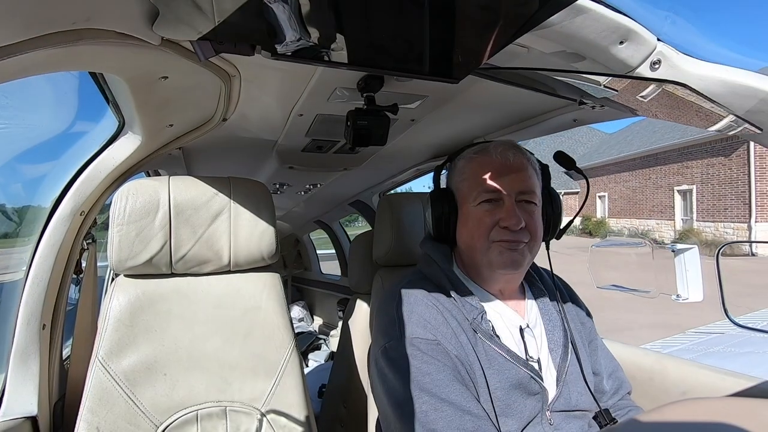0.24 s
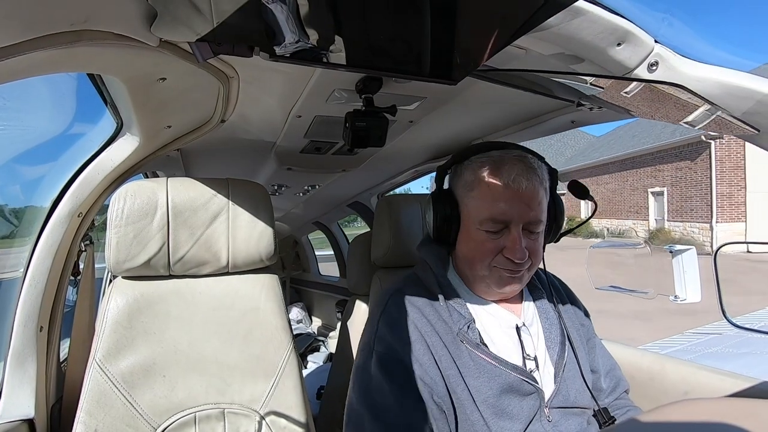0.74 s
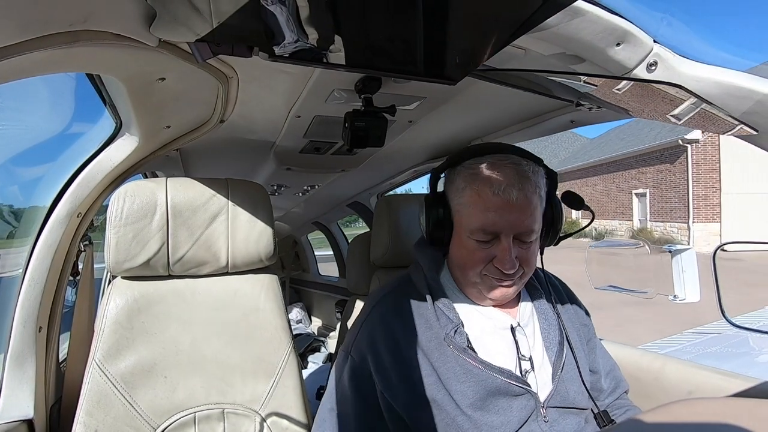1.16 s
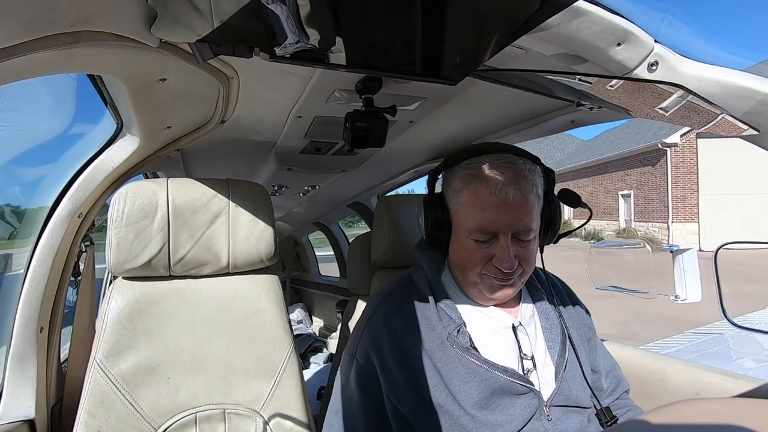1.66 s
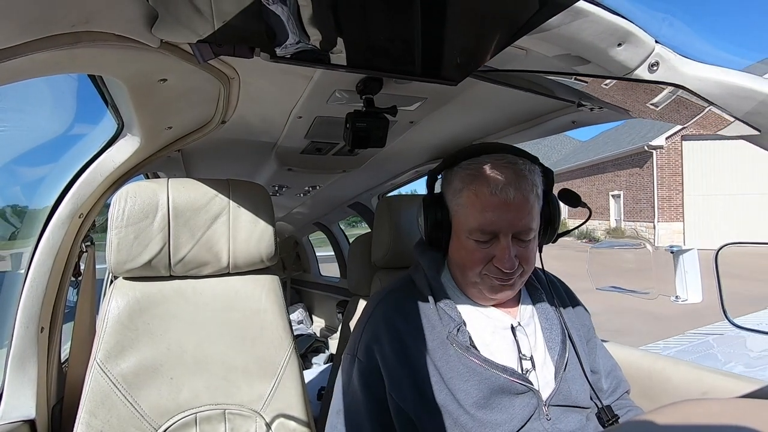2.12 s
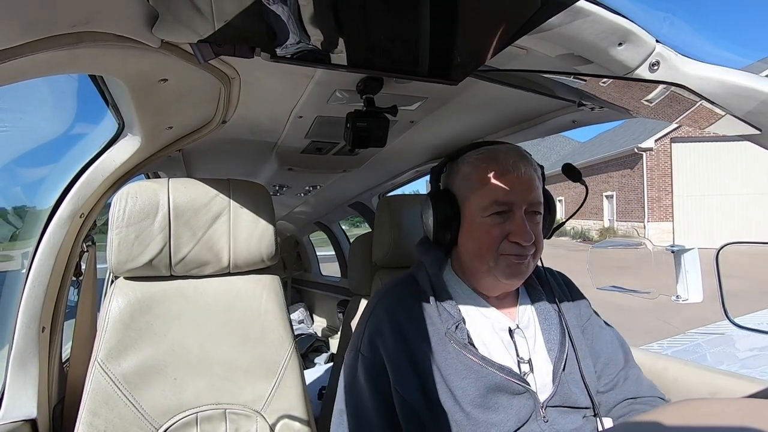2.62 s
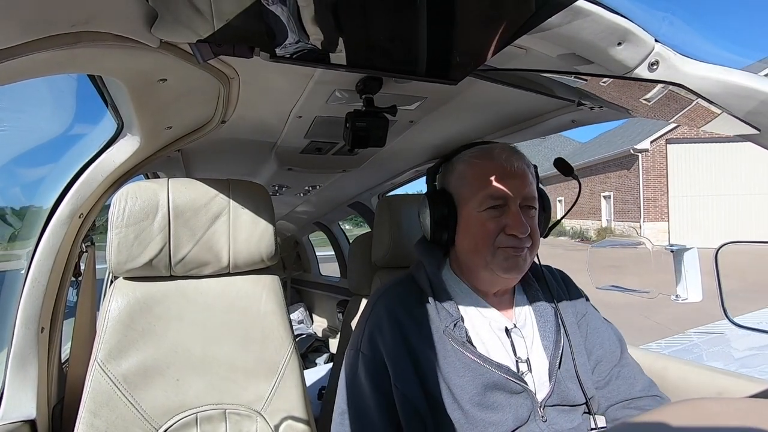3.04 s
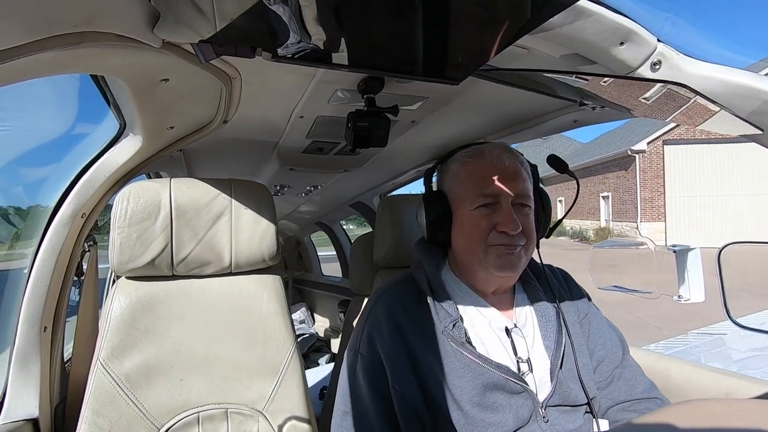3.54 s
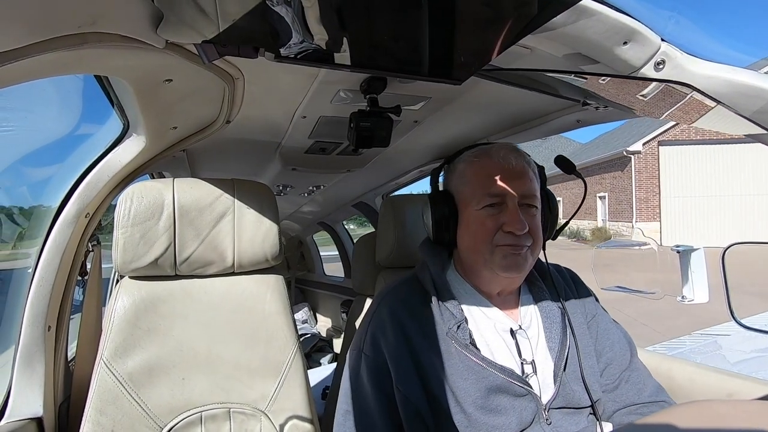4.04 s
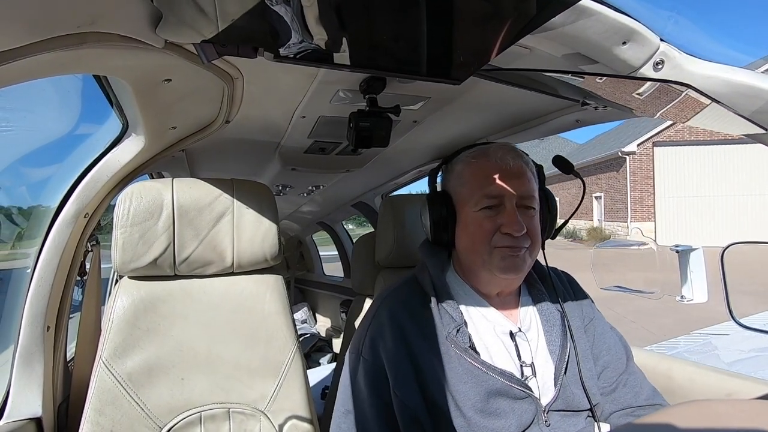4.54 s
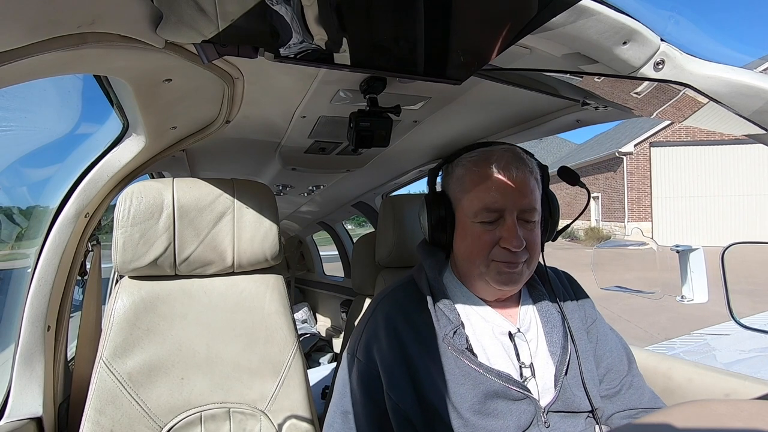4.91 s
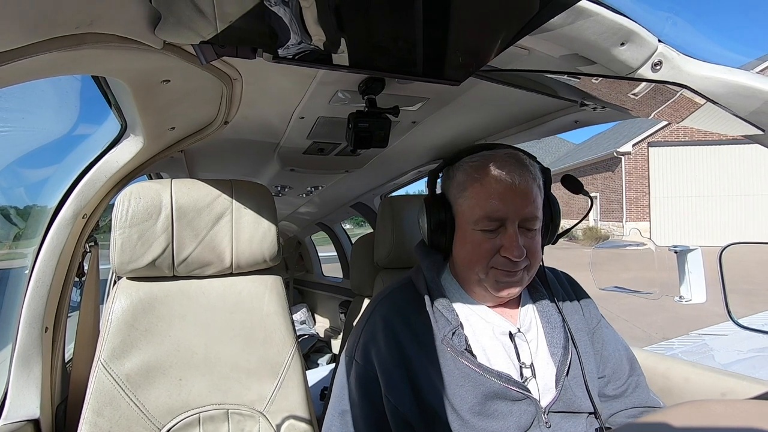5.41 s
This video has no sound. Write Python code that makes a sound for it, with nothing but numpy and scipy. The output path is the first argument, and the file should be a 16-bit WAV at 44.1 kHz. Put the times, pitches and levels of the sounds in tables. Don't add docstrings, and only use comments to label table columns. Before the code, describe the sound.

Inside a small parked aircraft, a piston engine idles in a deep, throbbing drone with low rumble, pulsing hiss and dry trim rattles.

```python
import sys
import numpy as np
from scipy import signal
from scipy.fft import rfft, irfft, next_fast_len
from scipy.io import wavfile
from scipy.ndimage import uniform_filter1d

SR = 44100
rng = np.random.default_rng(int(sys.argv[2]) if len(sys.argv) > 2 else 0)


def nominal_scale(level):
    x = np.asarray(level, float) / 20
    return 10 ** x


def master(y):
    cut = np.clip(np.atleast_2d(y).T, -1, 1)
    pcm = np.round(cut * 32767)
    wavfile.write(sys.argv[1], SR, pcm.astype(np.int16))


N = 250124
IDLE_RPM = 1085

# (time [s], speed [rpm])
CRANK_SPEED = [(0.2, 1105.5), (0.6, 1098.9), (1.0, 1094.1), (1.4, 1090.2), (1.8, 1085.9), (2.2, 1085.5),
               (2.6, 1082.9), (3.0, 1084.5), (3.4, 1085.1), (3.8, 1088.1), (4.2, 1089.6), (4.6, 1086.3),
               (5.0, 1082.0), (5.4, 1080.4)]
# (time [s], wash [dB], bite [dB])
ENGINE_LOAD = [(0.0, -32.5, -31.5), (0.3, -29.5, -28), (0.54, -30, -34), (0.75, -27, -25),
               (1.2, -29, -23.5), (1.6, -28.5, -22), (2.05, -27.5, -20.5), (2.7, -28.5, -20),
               (3.0, -26.5, -18), (3.45, -26, -20.5), (3.75, -28, -16.5), (3.95, -28.5, -18.5),
               (4.35, -28, -20), (4.75, -29.5, -24.5), (5.12, -30.5, -18), (5.67, -29.5, -26.5)]
LEAD_ORDERS = (6, 12, 18, 9, 24, 36, 90, 30)
# (mean [dB], share of wash [dB/dB], share of bite [dB/dB], rise above idle [dB/rpm])
LEAD_LAWS = [
    (-19.5, -0.7, 0.03, -0.0762),
    (-21.5, 0.15, 1.0, .01),
    (-22.5, 0.43, 0.31, 0.27),
    (-30.5, 2.3, -1.2, -0.175),
    (-39.5, 1.15, 1.87, 0.61),
    (-42.5, -0.9, 0.13, 0.0647),
    (-55.5, -0.2, -0.5, 0.28),
    (-42.5, -1.4, 0.63, -0.19),
]
# (time [s], half length [s], rise [dB])
PANEL_SWELLS = [
    (1.203, 1.5, 8),
    (1.602, .4, 13.5),
    (3.1, 0.92, 8),
]
# (multiple of the cycle [1], level against firing [dB])
WEAK_ORDERS = [(1, -32), (2, -24), (3, -20), (4, -19), (5, -20), (7, -16), (8, -17), (10, -18), (11, -15),
               (13, -25), (14, -17), (15, -20), (16, -33), (17, -27), (19, -14), (20, -16), (21, -11),
               (22, -17), (23, -21), (25, -23), (26, -19), (27, -22), (28, -24), (29, -19), (31, -20),
               (32, -30), (33, -20)]
# (multiple of the cycle [1], level [dB])
PANEL_ORDERS = [(47, -46), (49, -47.5), (52, -48.5), (54, -44.5), (57, -51), (59, -55.5), (60, -52.5),
                (62, -52.5), (66, -50.5), (67, -51), (72, -52.5), (79, -51), (87, -51), (91, -53.5),
                (114, -53), (126, -55.5), (179.5, -63.5)]
# (frequency [Hz], level [dB per Hz])
RUMBLE_SPECTRUM = [(18, -20), (35, 1), (60, -6), (100, -1.5), (124, -8.5), (142, -8), (154, -7.5),
                   (178, -3.5), (230, -8), (290, -8), (350, -11), (600, -12.5), (1100, -19.5), (1500, -32)]
# (frequency [Hz], level [dB per Hz])
CLATTER_SPECTRUM = [(1100, 3), (1600, 3.5), (2300, -14), (2750, 0.5), (3300, -4), (3950, -10.5),
                    (4600, -17.5), (5200, -30)]
# (place in cycle [0-1], rise [dB], decay [cycles])
VALVE_SEATINGS = [
    (.40, 2.5, .12),
    (.86, 2.5, .15),
]
# (time [s], peak level [dB], left over right [dB])
TRIM_KNOCKS = [(0.1865, -34, 0), (0.5975, -34, -1), (0.6355, -34, -6.5), (0.7222, -38, 0),
               (0.8011, -28.5, -7), (0.857, -35, -6.5), (0.9657, -32, -1.5), (1.075, -36, -4),
               (1.1847, -33, -3), (1.2481, -37.5, -8), (1.296, -34, 3.5), (1.8477, -34, -3),
               (1.9699, -32, 0), (2.0677, -31.5, -0.5), (2.4009, -36, -10.5), (2.4907, -33, -2.5),
               (2.5782, -33, 1.5), (2.8411, -34, 4), (3.255, -35.5, 2.5), (3.3967, -36, -2),
               (4.398, -35.5, 0.5), (4.4473, -32.5, -5), (4.6154, -31.5, -4), (4.7042, -33, 0),
               (4.781, -38.5, -4), (4.8915, -33, -8), (5.1415, -35, -3), (5.2235, -36, 1),
               (5.3597, -38, -4.5)]
TICK_PLACES = (.40, .865)
# (frequency [Hz], level [dB], 60 dB decay time [s])
TRIM_MODES = [(1750, -5, .014), (2080, -6, .012), (2380, -4, .012), (2680, 0, .013), (2850, -1, .013),
              (3050, -2, .012), (3280, -1, .014), (3800, -7, .012)]
# (frequency [Hz], level [dB per Hz])
HISS_SPECTRUM = [(3500, -3.5), (4500, 2), (5500, -2.5), (7000, -3.5), (8600, -5), (9300, -15.5),
                 (10000, -6.5), (10500, -15), (11100, -29), (12000, -25.5), (13000, -25.5), (14200, -27.5)]
# (multiple of the cycle [1], level [dB])
GEAR_LINES = [(228, -1), (230, -4)]
# (multiple of the cycle [1], level [dB])
GEAR_OCTAVE_LINES = [(451, -3), (455, 0), (457, -4), (459, 0)]
# (frequency [Hz], width [Hz], level [dB])
CABIN_MODES = [(455, 9.2, -5.5), (520, 8.3, -0.5), (649, 3.2, 7), (745, 17, -5), (814, 6, 4), (967, 22, -3),
               (1185, 25, -2.5), (1274, 27, 4), (1950, 57, -2.5), (2330, 100, -4.5), (4100, 35, -1.5),
               (4150, 51, 5), (4245, 25, -1), (4400, 50, 2.5), (4550, 45, -6.5)]
# (frequency [Hz], likeness [0-1], left over right [dB], left lag [rad])
STEREO_PAIR = [(30, 0.94, -3.5, 0.49), (55, 0.7, -1, 0.17), (110, 1, 0.5, 0.22), (200, .998, -1.2, 0.13),
               (447, 0.96, 2, 0.012), (700, 0.7, 1, 0.45), (1000, 0.3, -2.5, 0.62), (1420, 0, -3, 0.55),
               (2700, 0.77, -2, 0.13), (5000, 0.4, -1, 0.8), (8000, .05, -2, 1.0), (12000, 0.1, 6, 0.089)]


def in_time(rows):
    s, *columns = np.transpose(rows)
    return [np.interp(np.arange(N) / SR, s, column) for column in columns]


def at_hz(points, hz, axis=1):
    table = np.array(points)
    return np.interp(np.log(hz + 1e-9), np.log(table[:, 0]), table[:, axis])


def drift(rate_hz):
    pole = np.exp(-2 * np.pi * rate_hz * 40 / SR)
    noise = rng.standard_normal(N // 40 + 2002)
    slow = signal.lfilter([1], [1, -2 * pole, pole * pole], noise)[2000:]
    return np.interp(np.arange(N) / 40, np.arange(len(slow)), slow / slow.std())


def microphone_gains(hz):
    level = nominal_scale(at_hz(STEREO_PAIR, hz, axis=2) / 2)
    left = level * np.exp(-0.5j * at_hz(STEREO_PAIR, hz, axis=3))
    return np.array([left, 1 / left])


def tone(turns, db):
    hz = (turns[-1] - turns[0]) * SR / N
    alike = np.clip(at_hz(STEREO_PAIR, hz), 0, 1)
    scatter = np.arccos(alike) * rng.standard_normal() * (hz > 400)
    gains = (microphone_gains(hz) * np.exp([0.5j * scatter, -0.5j * scatter]))[:, None]
    angle = 2 * np.pi * (turns % 1)
    return np.sqrt(2) * nominal_scale(db) * abs(gains) * np.cos(angle + np.angle(gains))


def cabin_noise(spectrum, together_db, patchy_db, patch_hz):
    size = next_fast_len(N)
    hz = np.arange(size // 2 + 1) * SR / size
    low_hz, high_hz = spectrum[0][0], spectrum[-1][0]
    mid, side = rfft(rng.standard_normal((2, size)))
    alike = np.clip(at_hz(STEREO_PAIR, hz), 0, 1)
    full = np.sqrt(1 + alike) * mid + np.sqrt(1 - alike) * side * [[1], [-1]]
    full = full * microphone_gains(hz)
    standing_db = sum(db * np.exp(-((hz - centre_hz) / width) ** 2) for centre_hz, width, db in CABIN_MODES)
    full = full * nominal_scale(at_hz(spectrum, hz) + standing_db) * (hz > low_hz / 2)
    half_octaves = np.clip(2 * np.log2(hz / low_hz + 1e-9), 0, None)
    out = 0
    for band in range(int(2 * np.log2(high_hz / low_hz)) + 3):
        share = np.cos(np.pi / 2 * np.clip(half_octaves - band, -1, 1)) ** 2
        out = out + irfft(full * share, size)[:, :N] * nominal_scale(patchy_db * drift(patch_hz))
    out = out * nominal_scale(together_db)
    return out / np.sqrt(np.mean(out ** 2))


def lead_levels(wash, bite, above_idle):
    levels = [db + a * wash + b * bite + c * above_idle for db, a, b, c in LEAD_LAWS]
    time = np.arange(N) / SR
    first = len(levels) - len(PANEL_SWELLS)
    for k, (s, half_s, rise_db) in enumerate(PANEL_SWELLS):
        levels[first + k] = levels[first + k] + rise_db * np.exp(-((time - s) / half_s) ** 4)
    return levels


def engine_drone(cycle, lead_db):
    firing_lag, firing_wander, weak_wander = 0.055, 0.0014, 0.003
    pulse_spread = 0.011
    out = 0
    for k, db in zip(LEAD_ORDERS, lead_db):
        timing = cycle - firing_lag + firing_wander * drift(3.0)
        smear = pulse_spread * (k / LEAD_ORDERS[0]) ** 3
        out = out + tone(k * timing + 0.5 + smear, db + 0.7 * drift(3.1))
    even = [(k, -24.5) for k in range(34, 43) if k not in LEAD_ORDERS]
    weak = [(k, db - 21) for k, db in WEAK_ORDERS + even]
    for k, db in weak + PANEL_ORDERS:
        waver = drift(0.86)
        timing = cycle + weak_wander * waver[::-1]
        out = out + tone(k * timing + rng.random(), db + 1.8 * waver)
    return out


def airframe_rumble(wash, valves_db):
    level = nominal_scale(-29 + 1.5 * wash + 4.0)
    return level * cabin_noise(RUMBLE_SPECTRUM, 0.71 * valves_db, patchy_db=0.67, patch_hz=3.1)


def valve_pulse(cycle):
    out = 0
    luck = rng.random((80, len(VALVE_SEATINGS)))
    for k, (place, rise_db, decay) in enumerate(VALVE_SEATINGS):
        since = cycle - place + 1
        out = out + rise_db * 2 * luck[since.astype(int), k] * np.exp(-(since % 1) / decay)
    return uniform_filter1d(out, size=220)


def valve_clatter(wash, valves_db, gusts):
    level = nominal_scale(-45.5 + 0.99 * wash + 2.5)
    together_db = 0.29 * valves_db + 0.53 * gusts
    return level * cabin_noise(CLATTER_SPECTRUM, together_db, patchy_db=-0.5, patch_hz=15.0)


def knock_list(cycle):
    hard = np.array(TRIM_KNOCKS)
    luck = rng.standard_normal((100, 3))
    first = np.arange(100) % 2 == 0
    places = (np.arange(50)[:, None] + TICK_PLACES).ravel() + 0.03 * luck[:, 2] * first
    s = np.interp(places, cycle, np.arange(N) / SR)
    peak_db = -40 + 2.5 * luck[:, 0] - 3 * first
    ticks = np.c_[s, peak_db, -2 + 2.5 * luck[:, 1]]
    free = abs(s[:, None] - hard[:, 0]).min(axis=1) > 0.015
    return np.r_[hard, ticks[free]].T


def trim_rattles(cycle):
    s, peak_db, pan_db = knock_list(cycle)
    at = (s * SR).astype(int)[:, None] + np.arange(900)
    age = np.arange(900) / SR
    buzz = rng.standard_normal(at.shape) * np.sqrt(age / 0.0025) * np.exp(-age / 0.0055)
    buzz = buzz / buzz.std(axis=1, keepdims=True) * 0.32
    luck = np.clip(rng.standard_normal((len(s), len(TRIM_MODES))), -1.5, 1.5)

    def knocks(db):
        train = np.full((2, N), 1e-18)
        train[:, at] = buzz * nominal_scale(db + np.outer([0.5, -0.5], pan_db))[:, :, None]
        return train

    crack_band = signal.butter(4, [4200, 11000], "band", fs=SR, output="sos")
    crack_db = peak_db + 0.5 * (peak_db + 34.5) - 36.5
    out = signal.sosfilt(crack_band, knocks(crack_db))
    for (hz, level_db, t60), chance in zip(TRIM_MODES, luck.T):
        r, w = nominal_scale(-60 / (t60 * SR)), 2 * np.pi * hz / SR
        struck = knocks(peak_db + level_db - 26.0 + 2.0 * chance)
        out += signal.lfilter([0, np.sin(w)], [1, -2 * r * np.cos(w), r * r], struck)
    treble_cut = signal.butter(4, 10500, fs=SR, output="sos")
    return signal.sosfilt(treble_cut, out)


def door_seal_hiss(wash, valves_db, gusts):
    level = nominal_scale(-61 + 0.45 * wash + 3.5)
    together_db = 1.1 * valves_db + 0.3 * gusts
    return level * cabin_noise(HISS_SPECTRUM, together_db, patchy_db=0.5, patch_hz=16.0)


def whines(cycle, above_idle):
    gyro_hz = 2863.3
    out = tone(gyro_hz * np.arange(N) / SR, -60 + 0.63 * drift(1.5))
    gear_db = -61.5 + 0.05 * above_idle
    octave_db = -77 + 0.75 * np.clip(above_idle, 0, 10)
    for lines, level_db in ((GEAR_LINES, gear_db), (GEAR_OCTAVE_LINES, octave_db)):
        for k, db in lines:
            turns = k * cycle + rng.random() + 0.12 * drift(9)
            out += tone(turns, level_db + db + 2.5 * drift(6))
    return out


def scene():
    rpm, = in_time(CRANK_SPEED)
    above_idle = rpm - IDLE_RPM
    cycle = np.cumsum(rpm / 120) / SR
    wash, bite = (column - column.mean() for column in in_time(ENGINE_LOAD))
    valves_db = valve_pulse(cycle)
    gusts = drift(6.7)
    mix = engine_drone(cycle, lead_levels(wash, bite, above_idle))
    mix = mix + airframe_rumble(wash, valves_db)
    mix = mix + valve_clatter(wash, valves_db, gusts)
    mix = mix + trim_rattles(cycle)
    mix = mix + door_seal_hiss(wash, valves_db, gusts)
    return mix + whines(cycle, above_idle)


def top_cut(x):
    return signal.sosfilt(signal.butter(12, 14255, fs=SR, output="sos"), x)


def record(dry):
    ramp_in = np.arange(N) / 60
    ramp_out = 0.5 + np.arange(N)[::-1] / 400
    ease = np.minimum(np.minimum(ramp_in, ramp_out), 1)
    mix = 0.69 * np.tanh(dry / 0.67) * ease + 0.001
    return top_cut(mix)


dry = scene()
out = record(dry)
master(out)
```